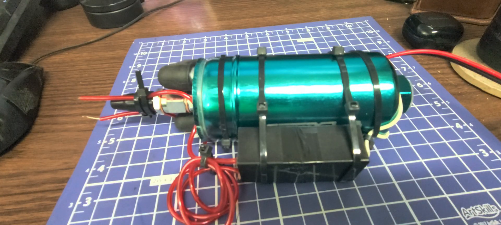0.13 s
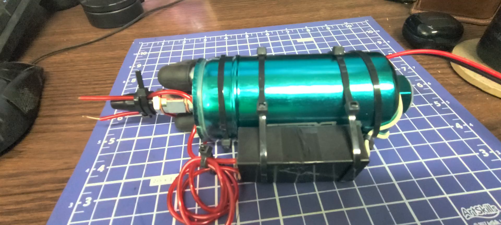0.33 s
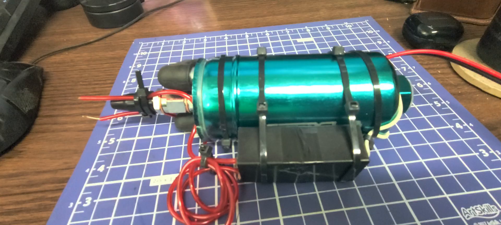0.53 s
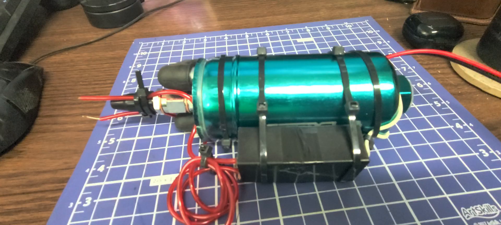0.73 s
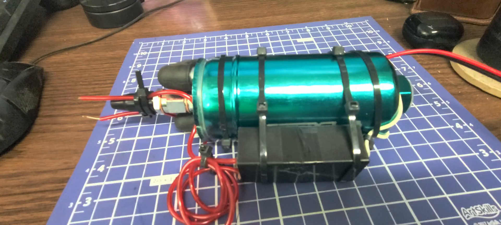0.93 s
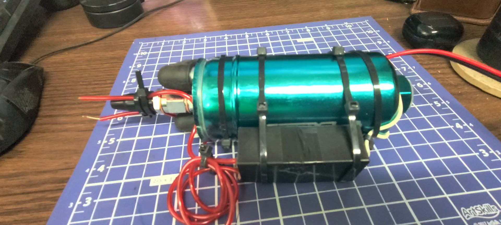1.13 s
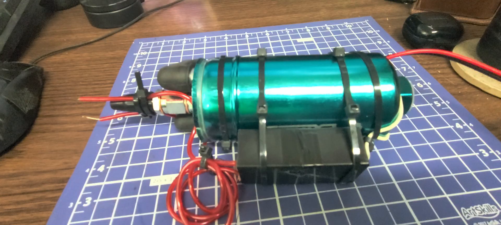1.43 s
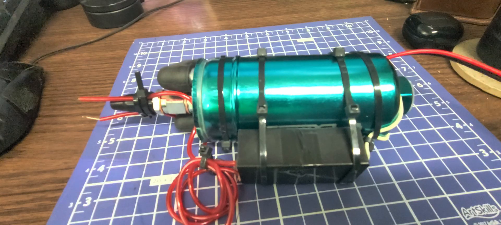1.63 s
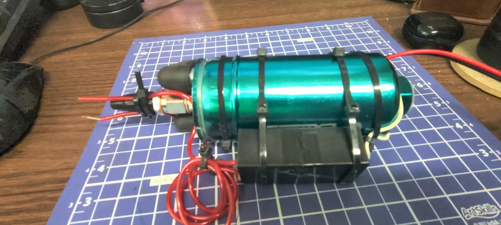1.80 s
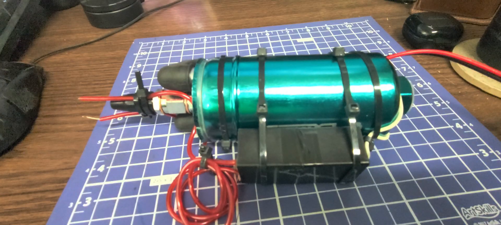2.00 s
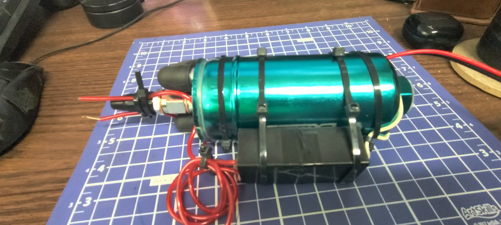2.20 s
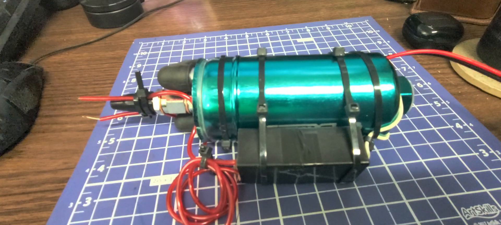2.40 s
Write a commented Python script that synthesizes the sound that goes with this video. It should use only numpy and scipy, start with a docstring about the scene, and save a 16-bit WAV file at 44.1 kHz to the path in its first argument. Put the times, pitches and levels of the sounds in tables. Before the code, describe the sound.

A small electric pump close to the microphone: a switch double-clicks in a quiet humming room, then after a pause the motor ticks, spins up hissing and clatters with rapid sharp snaps on a bench.

```python
"""A small electric pump runs dry on a workbench, close to the microphone, in a quiet room with a low hum.
A switch clicks; a second later the motor ticks into motion and spins up to a hissing buzz: sines locked
to the shaft and noise that partly recurs on every turn. About seventeen times a second the mechanism
binds, shudders and rasps (swelling noise and a low tone), then lets go with a hard snap: a pressure
spike, ringing resonances of the casing and a thump into the bench."""
import sys
import numpy as np
from scipy import signal
from scipy.fft import rfft, irfft
from scipy.io import wavfile
from scipy.ndimage import map_coordinates

SR = 44100
rng = np.random.default_rng(int(sys.argv[2]) if len(sys.argv) > 2 else 0)


def wav_record(signal):
    """Record a signal, one row per channel, as 16-bit PCM in the file named by sys.argv[1]."""
    frames = np.transpose(np.atleast_2d(signal))
    bounded = np.clip(frames, -1, 1)
    # unit amplitude maps onto the largest positive 16-bit level
    quanta = np.round(bounded * 32767).astype(np.int16)
    wavfile.write(sys.argv[1], SR, quanta)


N = 112454
TIME = np.arange(N) / SR


def from_db(db):
    """Decibels to gain."""
    return 10 ** (np.asarray(db) / 20)


def stereo(pair_db):
    """A (left, right) pair of levels as a column of gains."""
    return from_db(pair_db)[:, None]


def rms_one(x):
    """Scale to an rms of 1."""
    return x / np.sqrt(np.mean(x ** 2) + 1e-20)


def in_time(rows):
    """A curve's value at every sample."""
    return np.interp(TIME, *np.transpose(rows))


def level_curve(rows):
    """A curve of levels in dB as a gain, practically silent before its first point."""
    return from_db(np.interp(TIME, *np.transpose(rows), left=-130))


def per_bin(points):
    """A table over frequency, read at every Fourier bin."""
    hz, value = np.transpose(points)
    bin_hz = np.arange(N // 2 + 1) * SR / N
    return np.interp(np.log(bin_hz + 1), np.log(hz), value)


def coloured(x, colour):
    """Give a sound a spectrum; rms 1."""
    return rms_one(irfft(rfft(x) * from_db(per_bin(colour)), N))


def white():
    """Unrelated noise in the two channels."""
    return rng.standard_normal((2, N))


def drift(rate_hz):
    """Slow random movement with a spread of 1."""
    hz = np.arange(N // 2 + 1) * SR / N
    spectrum = rfft(rng.standard_normal(N)) / (1 + (hz / rate_hz) ** 2)
    return rms_one(irfft(spectrum, N))


def decay(start, t60):
    """An envelope that jumps to 1 and falls by 60 dB every t60 seconds."""
    return (TIME >= start) * from_db(-60 * np.clip((TIME - start) / t60, 0, 4))


def bell(t, width_s):
    """A smooth bump centred on t = 0."""
    return np.exp(-.5 * np.minimum((t / width_s) ** 2, 2 * 20))


def resonance(x, hz, width_hz):
    """A two-pole band-pass."""
    r = np.exp(-np.pi * width_hz / SR)
    return signal.lfilter([1, 0, -1], [1, -2 * r * np.cos(2 * np.pi * hz / SR), r * r], x)


# Tone of the quiet room. Each row: frequency in Hz, relative level in dB per Hz.
ROOM_COLOUR = [(15, -54), (25, -24), (56, -11.5), (117, -11), (141, -10), (277, -6), (317, -6.5),
               (439, -12.5), (531, -10.5), (607, -17.5), (818, -25), (988, -14), (1190, -26), (2000, -20),
               (2610, -33.5), (2990, -30.5), (6560, -49.5), (8360, -65), (16000, -53)]
# How alike the room is in both channels. Each row: frequency in Hz, likeness from 0 to 1.
ROOM_LIKENESS = [(60, 0.95), (240, 0.87), (950, 0), (3770, 0.1), (15000, 0.21)]
ROOM_DB, ROOM_HUM_HZ, ROOM_HUM_DB = -57, 108, -65.5


def room():
    """Steady noise, more or less shared by the channels at each frequency, and a low humming sine."""
    alike = np.clip(per_bin(ROOM_LIKENESS), 0, 1)
    mid, side = rfft(white())
    air = irfft(np.sqrt(1 + alike) * mid + np.sqrt(1 - alike) * side * [[1], [-1]], N)
    hum = np.sin(2 * np.pi * ROOM_HUM_HZ * TIME + 0.19 * drift(2.2)) * np.sqrt(2)
    return from_db(ROOM_DB) * coloured(air, ROOM_COLOUR) + from_db(ROOM_HUM_DB) * hum


# Faint rustles before the motor starts. Each row: centre in seconds, bump width in seconds, level in dB.
RUSTLES = [(0.14, 0.018, -68), (0.693, 0.11, -70.5)]
# Their tone. Each row: frequency in Hz, relative level in dB per Hz.
RUSTLE_COLOUR = [(300, -15), (1800, 4.5), (4000, -9), (6800, -12), (8000, -37)]


def rustles():
    """Soft rustling around the switch click: noise that swells and fades."""
    swells = sum(from_db(db) * bell(TIME - s, width) for s, width, db in RUSTLES)
    return swells * coloured(white(), RUSTLE_COLOUR)


# The two clicks of the switch. Each row: start in seconds, level in dB.
SWITCH = [(0.2103, -35.5), (0.213, -27)]
# Their tone. Each row: frequency in Hz, relative level in dB per Hz.
SWITCH_COLOUR = [(120, -29), (200, -9), (409, -24), (722, -8), (899, -21.5), (1450, -2.5), (1650, -4),
                 (3830, -2.5), (6280, -15), (8270, -40), (10500, -35), (16000, -34)]
SWITCH_CRACK_T60_S, ROOM_T60_S = 0.033, 0.26
SWITCH_ROOM_DB = -4  # room tail, relative to the click


def switch():
    """A double click and its tail in the room: noise under a fast and a slow decay, added as powers."""
    power = 0
    for s, db in SWITCH:
        click = decay(s, SWITCH_CRACK_T60_S)
        tail = from_db(SWITCH_ROOM_DB) * decay(s, ROOM_T60_S)
        power = power + from_db(db) ** 2 * (click ** 2 + tail ** 2)
    return np.sqrt(power) * coloured(white(), SWITCH_COLOUR)


# Ticks as the rotor starts. Each row: start in seconds, level in dB.
TICKS = [(1.4007, -34), (1.4048, -32), (1.4229, -25.5), (1.4284, -31), (1.442, -26.5)]
# Their tone. Each row: frequency in Hz, relative level in dB per Hz.
TICK_COLOUR = [(100, 0), (250, 11), (600, -1), (2500, 3.5), (4500, 5), (7000, 0), (10000, -30), (14000, 0)]
TICK_T60_S = 0.0058
KNOCK_AT_S, KNOCK_HZ, KNOCK_T60_S, KNOCK_DB = 1.404, 264, 0.041, -33.5  # the rotor's first jolt


def ticks():
    """Small contacts (noise bursts) and one dull knock (a dying sine) as the rotor starts to move."""
    tone = np.sin(2 * np.pi * KNOCK_HZ * (TIME - KNOCK_AT_S))
    knock = from_db(KNOCK_DB) * decay(KNOCK_AT_S, KNOCK_T60_S) * tone
    bursts = sum(from_db(db) * decay(s, TICK_T60_S) for s, db in TICKS)
    return knock + bursts * coloured(white(), TICK_COLOUR)


# Rumble of the bench under the pump. Each row: time in seconds, level in dB.
BENCH = [(1.39, -83), (1.41, -63), (1.52, -66), (1.55, -41), (1.85, -36.5), (2.0, -39), (2.55, -42.5)]
# Its tone. Each row: frequency in Hz, relative level in dB per Hz.
BENCH_COLOUR = [(15, -9), (35, -2), (70, 18.5), (120, -10), (280, -6.5), (500, -3.5), (2000, -67)]


def bench():
    """The shaken bench: low noise, mostly shared by the two channels."""
    rumble = rng.standard_normal(N) + 0.33 * white()
    return level_curve(BENCH) * coloured(rumble, BENCH_COLOUR)


WAVER_DB, WAVER_RAD = 3, 0.2  # unsteadiness: level spread from the tenth multiple up, phase spread


def partial(turns, order):
    """A sine at a multiple of the shaft speed; the high ones waver more in level."""
    phase = 2 * np.pi * (order * turns + rng.random()) + WAVER_RAD * drift(13)
    return np.sqrt(2) * np.sin(phase) * from_db(WAVER_DB * min(order / 10, 1) * drift(19))


# Growl of the motor spinning up. Each row: time in seconds, level in dB before panning.
GROWL = [(1.39, -90), (1.405, -54), (1.46, -56), (1.51, -55.5), (1.543, -26), (1.56, -48), (1.64, -65)]
GROWL_PAN_DB = [1.5, -7]  # (left, right)


def growl(turns):
    """The spin-up growl: one sine at four times the shaft speed."""
    return stereo(GROWL_PAN_DB) * level_curve(GROWL) * partial(turns, order=4)


# Overall level of the shaft's hum. Each row: time in seconds, level in dB.
HUM = [(1.39, -91), (1.42, -51), (1.52, -49.5), (1.65, -39), (1.9, -37.5), (2.2, -32), (2.55, -32.5)]
# Its partials. Each row: multiple of the shaft speed (rounded when played), left and right
# levels in dB relative to the hum.
PARTIALS = [(1, -13.5, -9.5), (2, 2, -2.5), (4, -9.5, -16), (5, -11.5, -20), (6, -33, -40),
            (9, -15.5, -21.5), (13, -13.5, -19), (15, -11, -13.5), (17, -21, -34), (20, -19, -16.5),
            (21, -23, -31), (24, -28, -16), (25, -13, -20), (36, -25, -18), (55, -35, -30),
            (75, -23, -12.5), (162.7, -19, -10.5), (187, -20, -11)]
# The hum swells by this share as the mechanism binds; width of the bump in seconds.
WHINE_SWELL, WHINE_SWELL_S = 0.98, 0.0077


def shaft_hum(turns):
    """Sines locked to the turning shaft, swelling shortly before each snap."""
    hum = sum(stereo([left, right]) * partial(turns, order=round(k)) for k, left, right in PARTIALS)
    binding = sum(bell(TIME - s + SHUDDER_LEAD_S, WHINE_SWELL_S) for s, *_ in SNAPS)
    swell = (1 + WHINE_SWELL * binding) / (1 + WHINE_SWELL / 2)
    return level_curve(HUM) * hum * swell


# Brush hiss close to the microphone. Each row: time in seconds, level in dB before its flicker.
HISS = [(1.39, -68), (1.405, -53.5), (1.44, -41), (1.48, -38.5), (1.505, -30), (1.54, -28.5), (1.6, -31.5),
        (2.0, -31), (2.55, -34)]
# Its tone. Each row: frequency in Hz, relative level in dB per Hz.
HISS_COLOUR = [(120, -32), (200, -6.5), (283, -13.5), (401, -19.5), (601, -26), (899, -22), (1160, -31),
               (1420, -21.5), (1940, -14), (2290, -19), (2560, -19.5), (2860, -14.5), (3310, -19),
               (3970, -10), (5130, -14.5), (6170, -10), (7010, -11), (7540, -16), (9580, -19.5),
               (12200, -17), (13300, -9.5), (15100, -9), (16000, -22.5)]
# Its place between the channels. Each row: frequency in Hz, left minus right in dB.
HISS_PAN = [(60, 3), (110, 12), (200, 1), (380, 2.5), (700, 4.5), (1290, 15.5), (2380, 5), (4400, -3.5),
            (8120, 2.5), (15000, -6.5)]
HISS_REPEATS = 0.54  # share of the power that recurs each turn
HISS_THROB, HISS_FLICKER_DB = 0.096, 1.66  # swing twice a turn, as a share; spread of the random flicker


def brush_hiss(turns):
    """Brushes rubbing: one turn's noise read again at the shaft angle, mixed with fresh noise."""
    track = rng.standard_normal((2, int(SR / SPEED[-1][1])))
    angle = turns % 1
    recurring = np.array([map_coordinates(side, [angle * len(side)], order=3, mode="grid-wrap")
                          for side in track])
    share = np.clip(HISS_REPEATS, 0, 1)
    rubbing = np.sqrt(share) * recurring + np.sqrt(1 - share) * white()
    brushes = rubbing * (1 + HISS_THROB * np.sin(4 * np.pi * turns))
    pan = from_db(per_bin(HISS_PAN) * [[.5], [-.5]])
    hiss = irfft(rfft(coloured(brushes, HISS_COLOUR)) * pan, N)
    return level_curve(HISS) * from_db(HISS_FLICKER_DB * drift(27)) * hiss


# Speed of the shaft before jitter. Each row: time in seconds, turns per second.
SPEED = [(1.40, 15), (1.47, 48), (1.54, 74), (1.6, 78), (1.68, 79.8), (1.8, 81), (2.29, 81.1), (2.55, 80.6)]
SPEED_JITTER = 0.002024  # random spread, as a share of the speed


def motor():
    """One turning shaft drives hum, growl and brush hiss; the bench rumbles along."""
    speed = in_time(SPEED) * (1 + SPEED_JITTER * drift(10.07))
    turns = np.cumsum(speed) / SR
    return shaft_hum(turns) + growl(turns) + brush_hiss(turns) + bench()


# Rasp of the binding mechanism. Each row: frequency in Hz, relative level in dB per Hz.
STRAIN_COLOUR = [(150, -1), (380, 4.5), (600, -2.5), (900, -6), (1250, 0.5), (1550, -7.5), (1900, 2.5),
                 (2400, -5), (3100, -0.5), (5000, -16), (9000, -14.5), (15000, -27)]
STRAIN_RISE_S, STRAIN_DB = 0.0083, [-21, -60]  # time constant of the build-up; level (left, right)
STRAIN_RELEASE_S = 0.00105  # the rasp stops this long before the snap
SHUDDER_HZ, SHUDDER_LEAD_S, SHUDDER_WIDTH_S = 167.5, 0.009, 0.009
SHUDDER_DB = [11.5, -20]  # (left, right), relative to the hum


def strain():
    """Before each snap a rasp of noise builds up and the body shudders for a few cycles."""
    build, shudder = 0, 0
    for s, *_, strain_db, _ in SNAPS:
        t = TIME - s
        rise = np.exp(-np.minimum(abs(t) / STRAIN_RISE_S, 20))
        build = build + from_db(strain_db) * (t < -STRAIN_RELEASE_S) * rise
        swell = np.exp(-np.minimum(((t + SHUDDER_LEAD_S) / SHUDDER_WIDTH_S) ** 2, 20))
        shudder = shudder + from_db(strain_db) * swell * np.cos(2 * np.pi * SHUDDER_HZ * t)
    rasp = stereo(STRAIN_DB) * build * coloured(white(), STRAIN_COLOUR)
    return rasp + stereo(SHUDDER_DB) * level_curve(HUM) * shudder


# The snaps, close to the microphone. Each row: time in seconds, crack in dB, crack width in seconds,
# depth of its suction from 0 to 1, casing ring in dB, strain before it in dB, thump in dB;
# all levels are relative to the settings of their layer.
SNAPS = [(1.5502, 5.5, 0.000029, 0.47, 0, 6, 0), (1.6050, -0.5, 0.00011, 1, -2, 5, 6.5),
         (1.6577, -0.5, 0.000066, 0.2, -4, 0.5, -1), (1.719, -0.5, 0.000079, 0.2, -6, 0.5, -2),
         (1.7754, -2.5, 0.000047, 1, -3, 1, -17), (1.8294, -16.5, 0.00017, 0, 0, -26, 8.5),
         (1.8876, 1.5, 0.0001, 0.9, 1, 0.5, 1), (1.9481, 0.5, 0.000054, 0.54, 1, -3.5, -3),
         (2.0027, 0.5, 0.000071, 0.4, -6, 0.5, 1), (2.0787, -0.5, 0.000088, 0.45, 0.5, -5.5, 3),
         (2.1331, -0.5, 0.000057, 0.53, 0, 0, -22), (2.1919, -0.5, 0.00015, 0.67, -1.5, 0.5, 1.5),
         (2.2582, 0, 0.000054, 1, -2.5, -4, 2), (2.3210, 0.5, 0.000044, 0.5, -1.5, 1.5, -31),
         (2.3814, 1, 0.000036, 0.77, -7, -1.5, -26), (2.4454, 2.5, 0.000031, 0.82, 0, 2.5, 1.5),
         (2.4925, 2.5, 0.000046, 0.38, 1, -1, -21), (2.5560, 0, .00007, .6, 0, 3.5, 0)]
# The casing's ring. Each row: frequency in Hz, width in Hz, left and right levels in dB.
CASING = [(1400, 1500, -63, -26), (3100, 700, -27.5, -23), (4970, 640, -24, -23.5), (6500, 180, -32, -19.5),
          (12260, 2000, -21.5, -13), (15770, 1900, -18, -10)]
CRACK_DIP_LEAD_S = 0.00014  # a short suction, then the pressure spike; the lead varies a little
CRACK_DB, RIGHT_LAG_S = [-3.5, -15], .0001  # (left, right); delay of the right channel
CRACK_RING_HZ, CRACK_RING_T60_S, CRACK_RING_DB = 3014, 0.0069, -11.5  # the spike's own short after-ring
RING_T60_S, REBOUND_S, REBOUND_DB, REBOUND_T60_S = 0.0084, 0.0016, -9, 0.011
THUMP_HZ, THUMP_T60_S, THUMP_DB = 79, 0.038, [-23.5, -26]  # level (left, right)


def snaps():
    """Each release is a sharp crack, a brief ring of the casing with one rebound, and a thump."""
    crack, ring, thump = 0, 0, 0
    for s, crack_db, width_s, suction, ring_db, _, thump_db in SNAPS:
        t = TIME - s - np.array([[0], [RIGHT_LAG_S]])
        lead = CRACK_DIP_LEAD_S * (1 + 0.045 * rng.standard_normal())
        after = from_db(CRACK_RING_DB) * decay(s, CRACK_RING_T60_S) * np.cos(2 * np.pi * CRACK_RING_HZ * t)
        after = after * (1 - bell(TIME - s, width_s))  # leaves room for the spike
        pressure = bell(t, width_s) + after - suction * bell(t + lead, width_s)
        crack = crack + from_db(crack_db) * pressure
        rebound = from_db(REBOUND_DB) * decay(s + REBOUND_S, REBOUND_T60_S)
        ring = ring + from_db(ring_db) * (decay(s + RIGHT_LAG_S, RING_T60_S) + rebound)
        boom = decay(s, THUMP_T60_S) * np.cos(2 * np.pi * THUMP_HZ * (TIME - s))
        thump = thump + from_db(thump_db) * boom
    casing = sum(stereo([left, right]) * rms_one(resonance(white(), hz, width))
                 for hz, width, left, right in CASING)
    return stereo(CRACK_DB) * crack + ring * casing + stereo(THUMP_DB) * thump


def scene():
    """The pump and its switch in the room."""
    return room() + rustles() + switch() + ticks() + motor() + strain() + snaps()


def record(dry):
    """Peaks are clipped at full scale, then a steep low-pass cuts the top above 16 kHz."""
    low_pass = signal.ellip(10, .2, 70, 16000, fs=SR, output="sos")
    return signal.sosfilt(low_pass, np.clip(dry, -1, 1))


dry = scene()
out = record(dry)
wav_record(out)
```